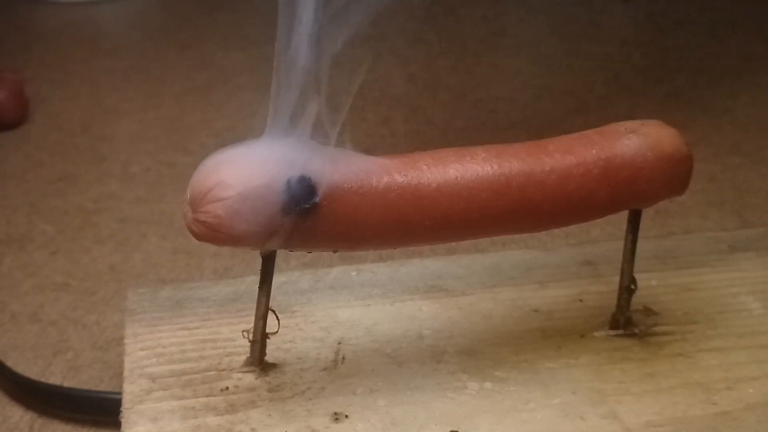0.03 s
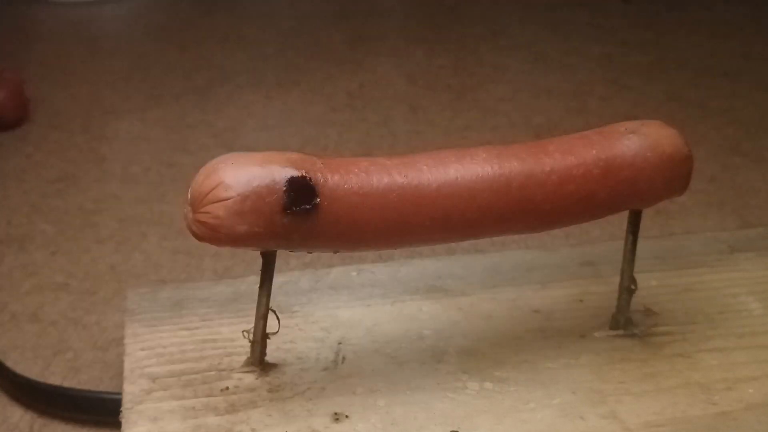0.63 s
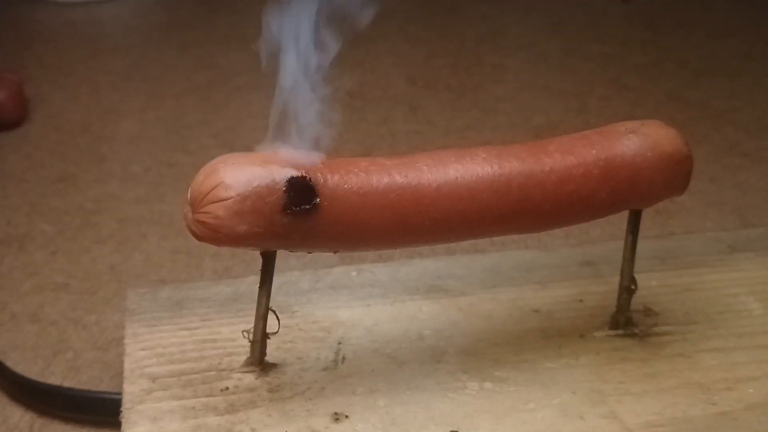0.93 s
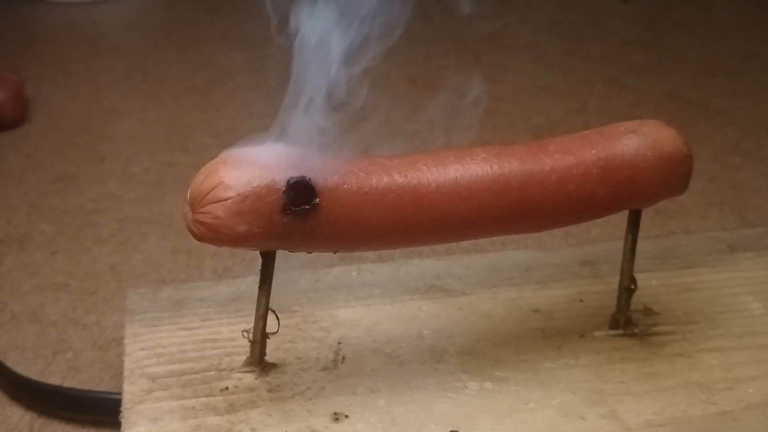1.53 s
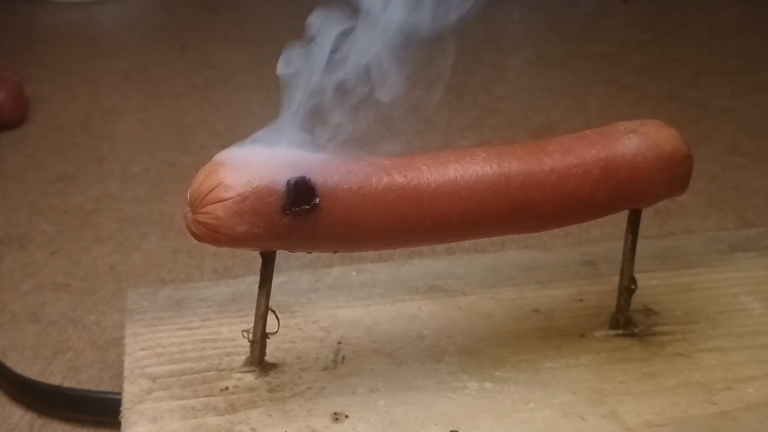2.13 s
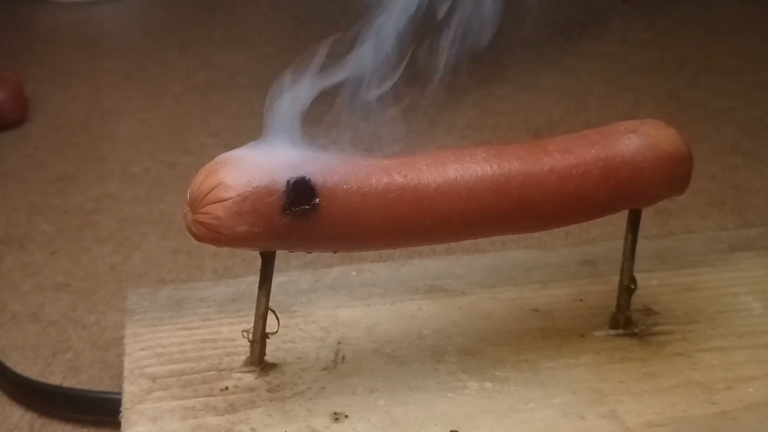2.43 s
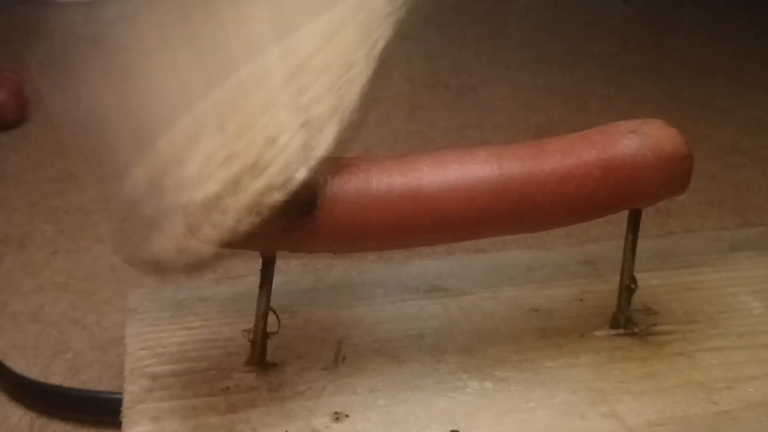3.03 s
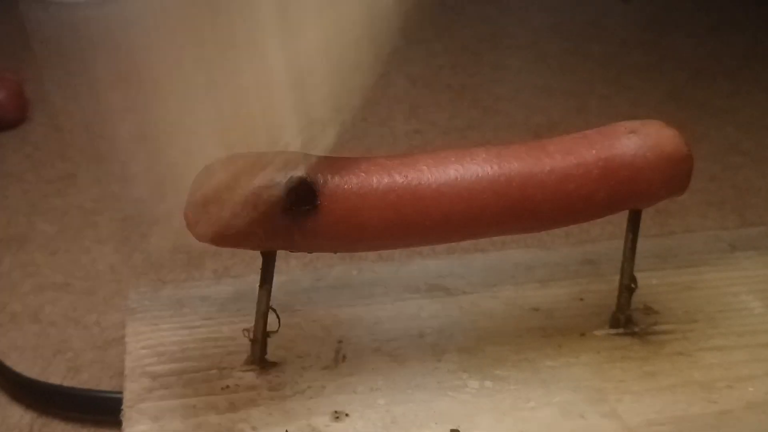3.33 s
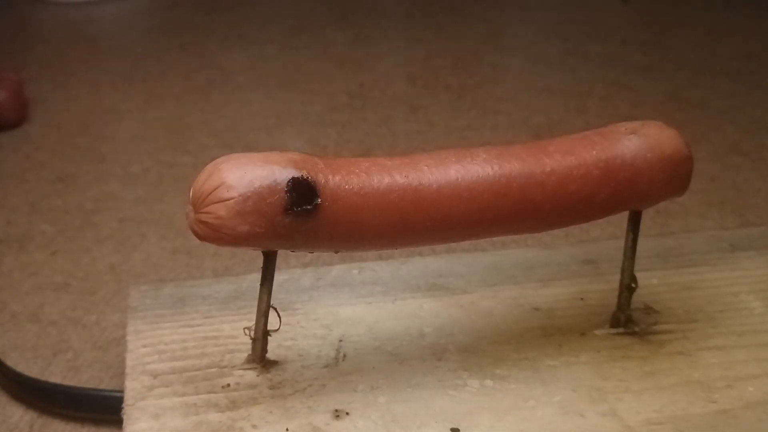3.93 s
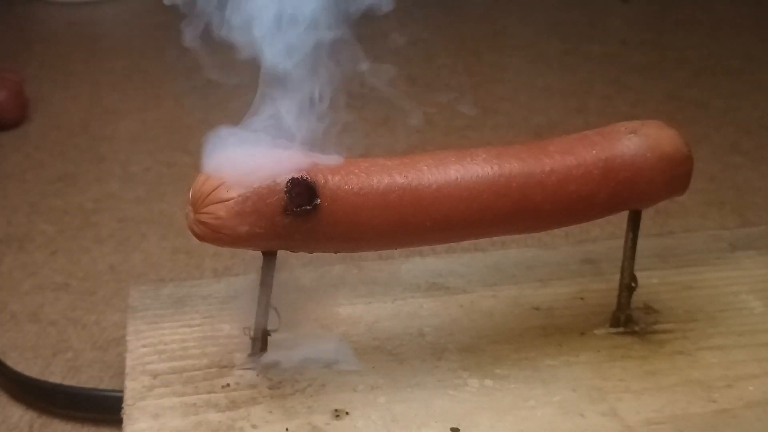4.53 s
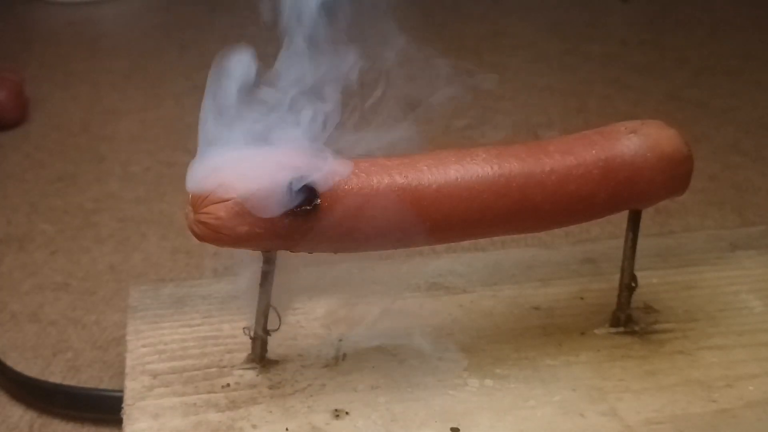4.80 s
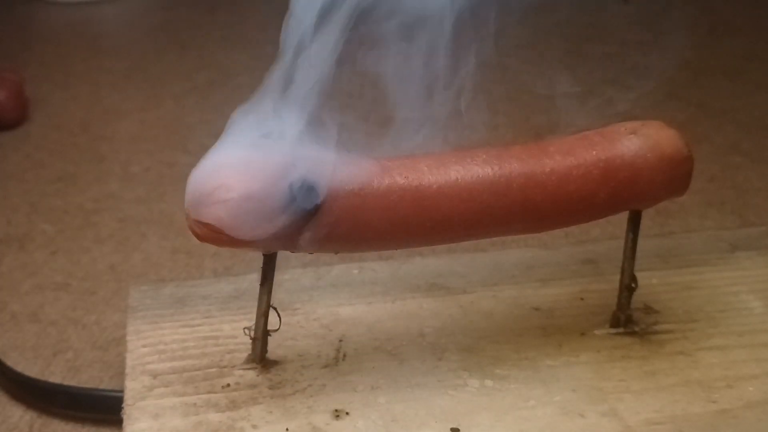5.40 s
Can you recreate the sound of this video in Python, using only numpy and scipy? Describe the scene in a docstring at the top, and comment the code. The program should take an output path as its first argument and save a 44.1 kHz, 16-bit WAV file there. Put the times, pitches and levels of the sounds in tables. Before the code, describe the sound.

A small, quiet room with a faint low rumble is heard first. At 0.8 seconds a switch snaps sharply and a sausage on two nails starts cooking by electric current, close by. Steam hisses brightly, mixed with a rapid, buzzing arc crackle, irregular sharp spits and a very soft hum. The sizzle flares, sinks, then swells briefly before a louder snap cuts it off at 2.1 seconds. In the pause come a faint metallic clink at 2.8 seconds, two small clacks that ring the bench at 3.0 and 3.3, and a light tick. At 3.85 seconds the switch snaps on again. The hiss surges louder than before, with strong spits around 4.1 to 4.3 and at 4.8 seconds, then gradually eases, still sizzling at the end, around 5.6 seconds.

```python
"""A sausage on two nails cooks on mains current, close by in a small, quiet room.
Steam hisses out round one nail; an arc there spits on each mains half-cycle, over a soft hum.
The boil flares after each switch-on and sinks as the meat dries. A switch snaps on, off, on.
Clicks and knocks ring the bench, mostly in the pause. Behind: rumble, a low drone, a thin whine."""
import sys
import numpy as np
from scipy import signal
from scipy.fft import rfft, irfft, next_fast_len
from scipy.io import wavfile
from scipy.ndimage import uniform_filter1d

SR = 44100
rng = np.random.default_rng(int(sys.argv[2]) if len(sys.argv) > 2 else 0)


def store_pcm(level_fs):
    """Save levels as 16-bit WAV."""
    pcm = np.round(np.clip(level_fs, -1, 1) * 32767).astype(np.int16)
    wavfile.write(sys.argv[1], SR, np.atleast_2d(pcm).T)


N = 245195
TIME_S = np.arange(N) / SR
GRID_HZ = np.fft.rfftfreq(4096, 1 / SR)

# left-right coherence: f/Hz, coherence/0-1
COHERENCE = [(60, 0.7), (250, 0.73), (700, 0.4), (1500, 0.1), (5000, 0.26), (16000, 0)]
# reverberation: f/Hz, T60/s
ROOM_DECAY = [(100, 0.286), (260, 0.28), (700, 0.23), (1840, 0.18), (4850, .18), (12800, 0.15)]
# relative noise spectra: f/Hz, density/dB
AIR_SPECTRUM = [(25, -41), (40, -24), (65, -5.5), (130, 1), (220, -4.5), (320, -9), (450, -12.5),
                (650, -13), (1000, -22.5), (2000, -29), (4500, -33.5), (7000, -27.5), (8300, -34.5),
                (9500, -22.5), (11000, -33.5), (14000, -30), (16000, -26)]
CLICK_SPECTRUM = [(200, -21), (1200, -11), (2600, -2), (3900, -4.5), (4750, -1), (5500, -7), (6600, 5),
                  (7800, -5.5), (9800, -10.5), (11500, -3.5), (16000, -2)]
RAP_SPECTRUM = [(40, -18), (200, 0), (550, 7.5), (900, 0), (1400, -4.5), (2500, -9), (3400, -8),
                (4500, -45), (16000, -18)]
RUSH_SPECTRUM = [(30, -17), (70, -11), (130, 6), (230, -4), (380, -4), (600, 0.5), (1000, -16.5),
                 (2000, -34), (16000, -44)]
STEAM_SPECTRUM = [(40, -37), (120, 2.5), (230, 3), (380, -10.5), (650, -8), (950, -10), (1800, -11.5),
                  (2700, -2), (3500, 2.5), (5200, -0.5), (8200, -1), (10000, -6), (16000, -1)]
ARC_SPECTRUM = [(100, -12), (400, -6.5), (1100, -2), (1800, -14), (2700, -6), (3600, 2), (6000, 1),
                (8400, -3.5), (10000, 0), (16000, -16.5)]
# rustles: t/s, sigma/s, level/dB
RUSTLES = [(.74, 0.13, -82), (2.743, 0.015, -77), (3.078, 0.024, -76), (3.495, 0.029, -76)]
# modes of the bench and of a small metal part: f/Hz, relative level/dB, T60/s
BENCH_MODES = [(76, -7.5, 0.17), (98.8, -2, 0.12), (124.6, -1.5, 0.17), (153, 0.5, 0.2), (222.4, 3.5, 0.17),
               (258.7, -1, 0.15), (310.6, 0.5, 0.19), (430.7, -6, 0.14), (567, -22.5, 0.14),
               (640, -17.5, 0.11), (834, -11, 0.15)]
METAL_MODES = [(4560, -3, .018), (4850, 0, .022), (5150, -5, .014), (6650, -6, .012), (6950, -9, .01)]
# two-stage clacks: t/s, click/dB, landing/dB
CLACKS = [(3.0095, -55.5, -54.5), (3.322, -46, -48)]
# dull knocks and light ticks on the bench: t/s, level/dB
KNOCKS = [(1.11, -52.5)]
TICKS = [(0.331, -71), (.361, -74.5), (3.137, -74), (3.762, -61)]
# switch throws: t/s, level/dB, closing/0 or 1
SWITCH_THROWS = [(0.8062, -31.5, 1), (2.1043, -29, 0), (3.8477, -32, 1)]
# switch resonances: f/Hz, width/Hz, closing gain/dB, opening gain/dB
SWITCH_MODES = [(305, 71, -49.5, -17), (792, 180, -24, -8.5), (1145, 400, -14, -11), (2920, 500, -13, -7),
                (3252, 180, -4, -6), (4130, 370, -11.5, -8.5), (6050, 1900, -11.5, -18),
                (8480, 2100, -13.5, -20), (11570, 1000, -6.5, -2), (12850, 910, 0.5, -2.5),
                (14380, 430, -13, 4.5), (15420, 340, -4, -22)]
# reflections off the board under the sausage: delay/s, gain/dB
BOARD_BOUNCES = [(.0006, -16.5), (.0013, -18), (.0027, -22.5)]
# current flow: on/s, off/s, boil flare/dB, drying time constant/s
POWER_SPANS = [(0.809, 2.088, 5.5, 0.28), (3.846, 5.7, 11, 0.92)]
# surges and dips of the boil: t/s, sigma/s, gain/dB
BOIL_SURGES = [(2.04, 0.044, 5), (5.022, 0.074, -3), (5.42, 0.038, -4.5)]
# resonances shared by steam and arc: f/Hz, width/Hz, gain/dB
SIZZLE_PEAKS = [(1261, 200, 8.5), (2245, 430, 8), (4260, 570, 7.5), (5840, 240, 6.5), (9750, 580, 8),
                (11305, 600, 13), (12890, 1100, 9.5), (15280, 1200, 2)]
# loudest spits of the arc: t/s, level before trim/dB
ARC_SPITS = [(0.8728, -34.5), (1.0226, -35.5), (1.189, -35.5), (1.2059, -40), (1.238, -41.5),
             (1.4383, -34.5), (1.5727, -38), (1.6056, -36.5), (1.7389, -39), (1.7561, -37), (4.1219, -37),
             (4.2377, -37), (4.2909, -34), (4.8386, -37), (5.44, -42.5)]

MAINS_HZ, FIRST_PEAK_S = 59.987, .0071
STEAM_DB, RUSH_DB, ARC_DB = -58.5, -71, -53  # base levels at settled boil
RUSH_DB_PER_DB, ARC_DB_PER_DB = .2, .45  # slopes against the boil
WEAK_HALF_DB, WEAK_DB_PER_DB = -28, 2.7


def amp(db):
    """dB to gain."""
    return 10 ** (np.asarray(db) / 20)


def unit_rms(x):
    """Scale to rms 1."""
    return x / np.sqrt(np.mean(x ** 2) + 1e-20)


def lookup(table, hz=GRID_HZ):
    """Interpolate over log frequency."""
    table_hz, value = np.transpose(table)
    return np.interp(np.log(hz + 1), np.log(table_hz + 1), value)


def add(mix, at_s, sound):
    """Mix in a stereo sound, in place."""
    part = mix[:, max(round(at_s * SR), 0):][:, :sound.shape[1]]
    part += sound[:, :part.shape[1]]


def pan(x, left_db):
    """Shift the balance left."""
    return x * amp([[left_db / 2], [-left_db / 2]])


def colour(x, gain_db):
    """Minimum-phase filter of unit energy; gains on GRID_HZ."""
    cepstrum = irfft(np.log(amp(gain_db)))
    half = len(cepstrum) // 2
    taps = irfft(np.exp(rfft(np.r_[cepstrum[0], 2 * cepstrum[1:half], np.zeros(half)])))
    return signal.oaconvolve(x, taps[None] / np.linalg.norm(taps), axes=1)[:, :N]


def noise(size, lag_s=.0002195):
    """Partly coherent stereo white noise; left lags by lag_s."""
    padded = next_fast_len(size, True)
    right, independent = rfft(rng.standard_normal((2, padded)))
    hz = np.fft.rfftfreq(padded, 1 / SR)
    coherence = np.clip(lookup(COHERENCE, hz), 0, 1)
    left = coherence * right + np.sqrt(1 - coherence ** 2) * independent
    left *= np.exp(-2j * np.pi * hz * lag_s)
    return irfft(np.array([left, right]), padded)[:, :size]


def bell(at_s, sigma_s, t=TIME_S):
    """Gaussian of height 1."""
    return np.exp(-.5 * ((t - at_s) / sigma_s) ** 2)


def wander(max_hz):
    """Random curve of rms 1."""
    sines = (np.sin(2 * np.pi * (max_hz * speed * TIME_S + phase))
             for speed, phase in rng.random((12, 2)))
    return unit_rms(sum(sines))


def grain(depth_db, samples):
    """Fast random gain of rms 1: countless tiny bursts."""
    return unit_rms(amp(depth_db * unit_rms(uniform_filter1d(rng.standard_normal(N), samples))))


def at_level(sound, db):
    """Give each channel the energy of 20 ms at db."""
    return amp(db) * sound / np.sqrt((sound ** 2).sum(1, keepdims=True) / (.02 * SR))


def background(air_db=-69.5, whine_db=-82.5, drone_hz=224.6, half_width_hz=16.5):
    """Room rumble and hiss, a narrow drone that swells once, a wavering electronic whine."""
    air = amp(air_db) * colour(noise(N, lag_s=0), lookup(AIR_SPECTRUM))
    drone_db = -72 + 11 * bell(at_s=3.81, sigma_s=.12)
    band_db = -20 * np.log10(1 + ((GRID_HZ - drone_hz) / half_width_hz) ** 2)
    drone = amp(drone_db) * colour(noise(N, lag_s=0), band_db)
    whine_hz = 14805 + 40 * wander(max_hz=1.1) + 35 * wander(max_hz=60)
    whine = amp(whine_db) * np.sin(2 * np.pi * np.cumsum(whine_hz) / SR)
    return pan(air + drone, 1.8) + pan(whine, .5)


def room(x):
    """Early bounce off a near wall and a short diffuse tail."""
    hz, t, bands = signal.stft(noise(SR // 2, lag_s=0), SR, nperseg=256)
    decay = amp(-60 * t / lookup(ROOM_DECAY, hz)[:, None])
    tail = signal.istft(bands * decay, SR, nperseg=256)[1]
    age_s = TIME_S[:tail.shape[1]]
    wall = .82 * bell(.0062, .0005, age_s)
    tail *= np.clip(age_s / .0027, 0, 1) + wall
    return signal.fftconvolve(x, tail / np.linalg.norm(tail[0]), axes=1)[:, :N]


def rustles():
    """Faint swells of scratchy noise."""
    swell = sum(amp(db) * bell(at_s, sigma_s) for at_s, sigma_s, db in RUSTLES)
    return colour(noise(N) * swell, lookup(CLICK_SPECTRUM) - 7 * GRID_HZ / 10000)


def contact(rise_s, rattle_s, rattle_db):
    """Crack plus weaker rattle, whitened to strike all resonances alike."""
    t = TIME_S[:2048]
    envelope = t / rise_s * np.exp(1 - t / rise_s) + amp(rattle_db) * np.exp(-t / rattle_s)
    crack = noise(len(t)) * envelope
    power = uniform_filter1d(abs(rfft(crack, 2 * len(t))) ** 2, size=50)
    return np.vstack([colour(side[None], -10 * np.log10(p)) for side, p in zip(crack, power)])


def ringing(modes, t):
    """Decaying modes, phase slightly different per channel."""
    return sum(amp(db - 60 * t / t60_s) * np.sin(2 * np.pi * hz * t + rng.normal(0, .35, (2, 1)))
               for hz, db, t60_s in modes)


def click(db):
    """Two hard parts meet."""
    crack = contact(rise_s=.0011, rattle_s=.0043, rattle_db=-14)
    return at_level(colour(crack, lookup(CLICK_SPECTRUM)), db)


def rap(db):
    """Dull impulse with a short rattle."""
    t = TIME_S[:SR // 4]
    push = amp(-27) * noise(len(t)) * np.exp(-t / .004)
    push[:, 0] = 1
    return at_level(colour(push, lookup(RAP_SPECTRUM)), db)


def ping(db):
    """A small metal part rings briefly."""
    return at_level(ringing(METAL_MODES, TIME_S[:SR // 4]), db)


def bench_ring(db, rise_s=.0035):
    """Low bench modes build up and decay."""
    t = TIME_S[:SR // 4]
    return at_level(ringing(BENCH_MODES, t) * (1 - np.exp(-t / rise_s)), db)


def bench(landing_s=.0243, clink_s=2.7718, jolt_db=-55.5):
    """Clacks, knocks, ticks, a clink and the opening switch each ring the bench."""
    landings = [(at_s + landing_s, db) for at_s, _, db in CLACKS]
    hits = [(at_s, [click(db), rap(-58.5), bench_ring(-48.5)]) for at_s, db, _ in CLACKS]
    hits += [(at_s, [rap(db), bench_ring(db - 16.5)]) for at_s, db in landings + list(KNOCKS)]
    hits += [(at_s, [click(db), bench_ring(db - 6)]) for at_s, db in TICKS]
    hits += [(clink_s, [ping(-62), click(-63.5), rap(-64), bench_ring(-60)])]
    hits += [(at_s, [bench_ring(jolt_db)]) for at_s, _, closing in SWITCH_THROWS if not closing]
    out = np.zeros((2, N))
    for at_s, sounds in hits:
        for sound in sounds:
            add(out, at_s, sound)
    return out


def shadow(x, left_db):
    """Source on the right: an obstacle shades the left treble."""
    bass = signal.sosfilt(signal.butter(1, 1600, fs=SR, output="sos"), x)
    return bass + pan(x - bass, left_db)


def switch(floor_db=-42):
    """Contacts slam over and ring the housing."""
    out = np.zeros((2, N))
    hz, width_hz, closing_db, opening_db = np.transpose(SWITCH_MODES)[:, :, None]
    peaks = 1 / (1 + ((GRID_HZ - hz) / (.64 * width_hz)) ** 2) ** 2
    for at_s, db, closing in SWITCH_THROWS:
        power = (amp(closing_db if closing else opening_db) ** 2 * peaks).sum(0) + amp(floor_db) ** 2
        crack = contact(rise_s=.0005, rattle_s=.0025, rattle_db=-8)
        add(out, at_s, at_level(colour(crack, 10 * np.log10(power)), db))
    return out


def powered():
    """1 while current flows, with short ramps."""
    gate = sum(1. * ((TIME_S > on_s) & (TIME_S < off_s)) for on_s, off_s, _, _ in POWER_SPANS)
    return uniform_filter1d(gate, size=500)


def hum():
    """Wavering tone at twice mains frequency while current flows."""
    drift = signal.sosfilt(signal.butter(2, 4, fs=SR, output="sos"), rng.standard_normal(N))
    waver = 1 + .97 * unit_rms(drift)
    return pan(amp(-75.5) * waver * powered() * np.sin(4 * np.pi * MAINS_HZ * TIME_S), 2.5)


def board(x):
    """Board reflections ripple the spectrum; right paths are 30% longer."""
    out = x.copy()
    for delay_s, db in BOARD_BOUNCES:
        add(out, delay_s, amp(db) * x * [[1], [0]])
        add(out, delay_s * 1.3, amp(db) * x * [[0], [1]])
    return out


def boil(heat_s=.17):
    """Boil in dB re settled: flares after switch-on, sinks as the meat dries."""
    boil_db = sum(db * bell(at_s, sigma_s) for at_s, sigma_s, db in BOIL_SURGES)
    for on_s, _, flare_db, drying_s in POWER_SPANS:
        heat = np.clip((TIME_S - on_s) / heat_s, 0, 1)
        wetness = np.exp(-np.maximum(TIME_S - on_s - heat_s, 0) / drying_s)
        boil_db += flare_db * heat * wetness
    return boil_db


def sizzle_colour(x, spectrum):
    """Filter by a broad spectrum plus the sizzle resonances."""
    peaks_db = sum(db / (1 + (2 * (GRID_HZ - hz) / width_hz) ** 2) for hz, width_hz, db in SIZZLE_PEAKS)
    return colour(x, lookup(spectrum) + peaks_db)


def steam(heave_db=3.1):
    """Jet round the nail, grainy with bursting bubbles, over a low, heaving rush of boiling."""
    boil_db = boil()
    jet = noise(N, lag_s=-.0002) * grain(2.2, samples=24) * amp(STEAM_DB + boil_db) * powered()
    rush_db = RUSH_DB + RUSH_DB_PER_DB * boil_db + heave_db * wander(max_hz=7)
    rush = colour(noise(N, lag_s=-.0001) * amp(rush_db) * powered(), lookup(RUSH_SPECTRUM))
    return pan(sizzle_colour(jet, STEAM_SPECTRUM), 1.94) + pan(rush, 4)


def arc(jitter_s=.00028, puff_sigma_s=.0014, spread_db=2, spit_trim_db=-3.5):
    """At each voltage peak the arc flashes juice to steam: a crackling puff of uneven size."""
    boil_db = boil()
    half_cycles = (TIME_S - FIRST_PEAK_S) * 2 * MAINS_HZ
    nearest = np.round(half_cycles).astype(int)
    size, early, length = rng.standard_normal((nearest.max() + 2, 3))[nearest].T
    from_peak_s = (half_cycles - nearest) / (2 * MAINS_HZ)
    puff = bell(-jitter_s * early, puff_sigma_s * amp(1.2 * length), from_peak_s)
    uneven_db = spread_db * np.minimum(size, 2)
    # one polarity burns weaker; it catches up while the meat is wet
    weak_db = (nearest % 2) * np.minimum(WEAK_HALF_DB + WEAK_DB_PER_DB * boil_db, 0)
    drive = puff * amp(ARC_DB + ARC_DB_PER_DB * boil_db + uneven_db + weak_db) * powered()
    for at_s, db in ARC_SPITS:  # harder, faster puffs
        near = abs(TIME_S - at_s) < .006
        flare = amp(db + spit_trim_db) * bell(at_s + .0016, .0008, TIME_S[near])
        drive[near] = np.maximum(.5 * drive[near], flare)
    crackle = noise(N, lag_s=-.00019) * drive * grain(2.6, samples=10)
    return pan(sizzle_colour(crackle, ARC_SPECTRUM), .79)


def scene():
    """Sausage nearest and driest; switch and knocks excite the room more."""
    sizzle = amp(.15) * board(steam() + arc())
    snaps = switch()
    knocks = bench() + rustles()
    echo = room(amp(-9) * sizzle + amp(-1.5) * shadow(snaps, -2) + amp(-2) * knocks)
    return sizzle + shadow(snaps, -6.5) + knocks + echo + hum() + background()


def record(dry):
    """Band limit, 50 Hz to 15.95 kHz."""
    thinned = signal.sosfilt(signal.butter(4, 50, "high", fs=SR, output="sos"), dry)
    lowpass = signal.firwin(401, 15950, window=("kaiser", 9), fs=SR)
    return signal.oaconvolve(thinned, lowpass[None], "same")


dry = scene()
out = record(dry)
store_pcm(out)
```